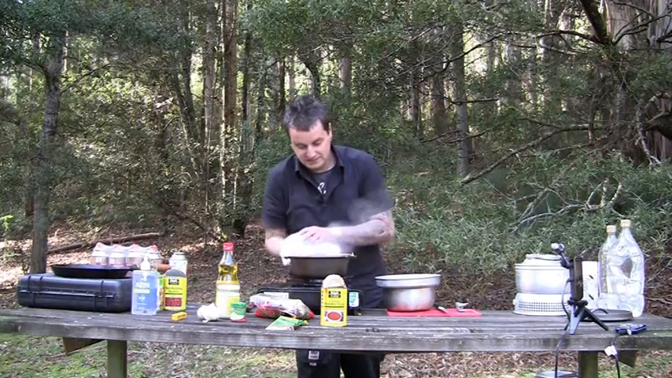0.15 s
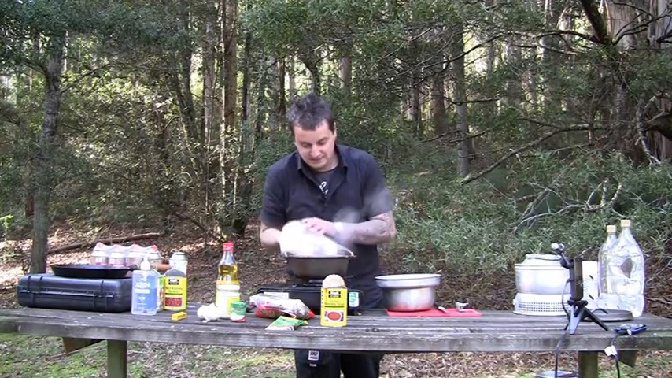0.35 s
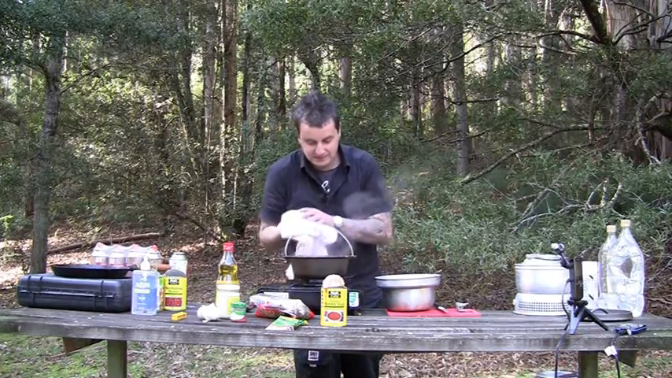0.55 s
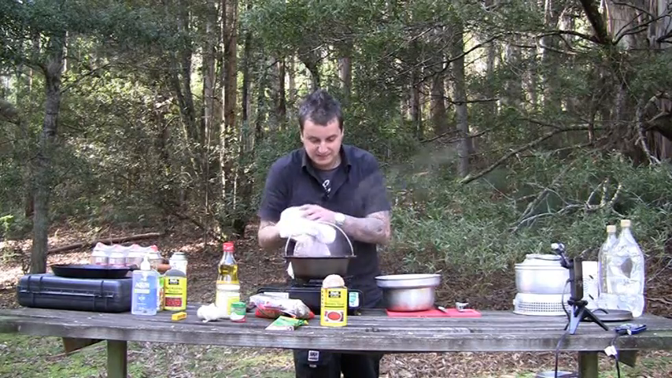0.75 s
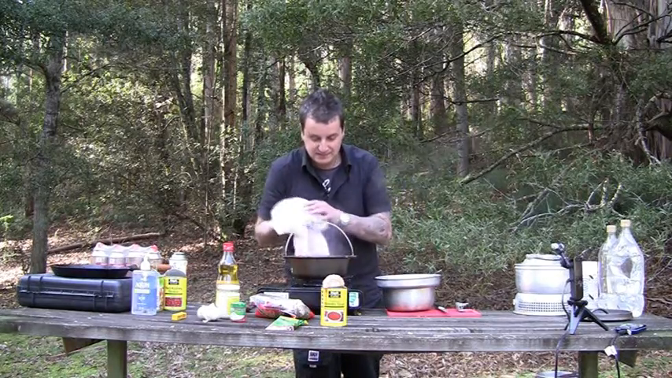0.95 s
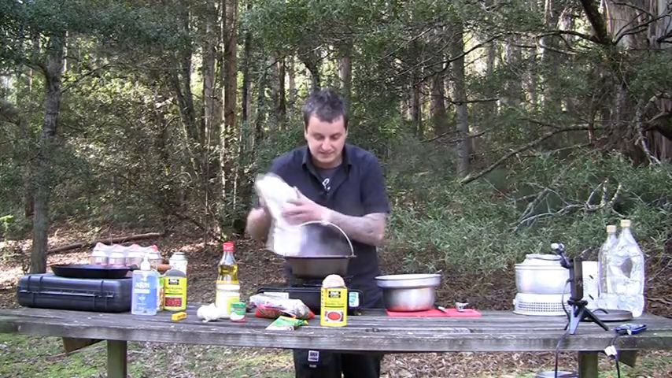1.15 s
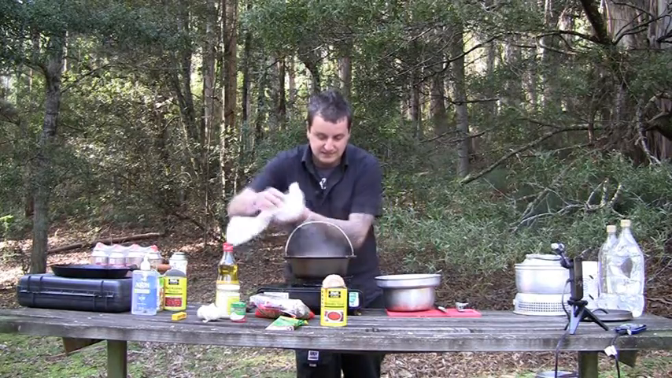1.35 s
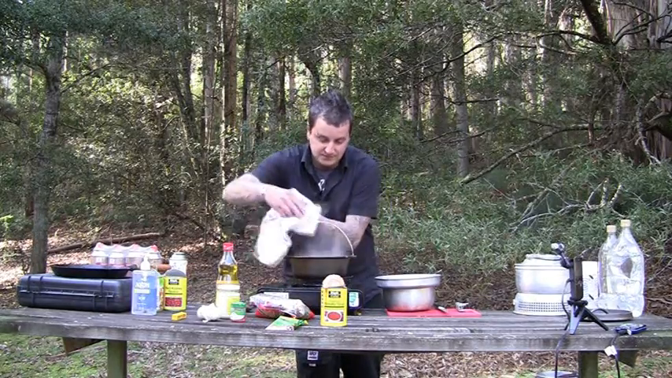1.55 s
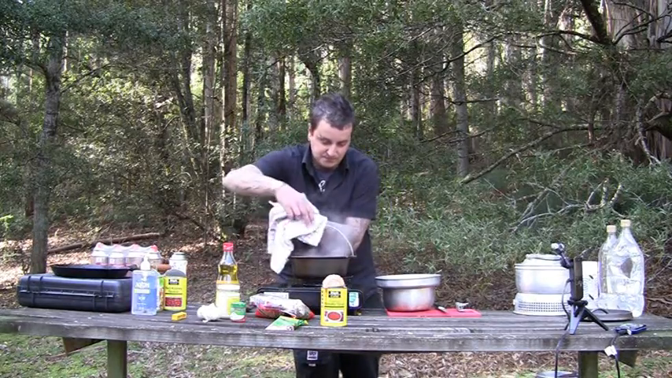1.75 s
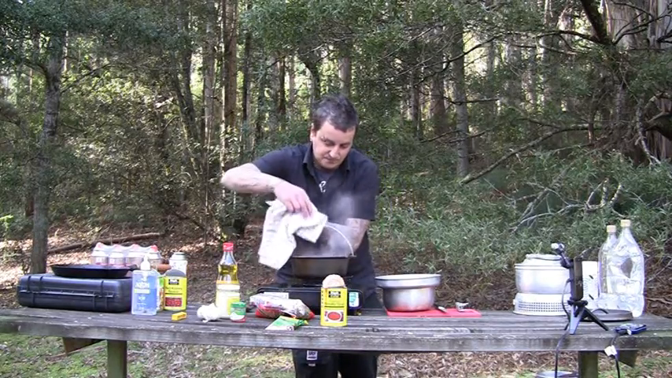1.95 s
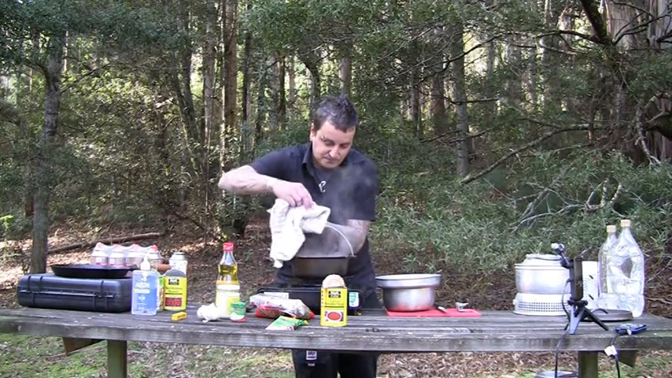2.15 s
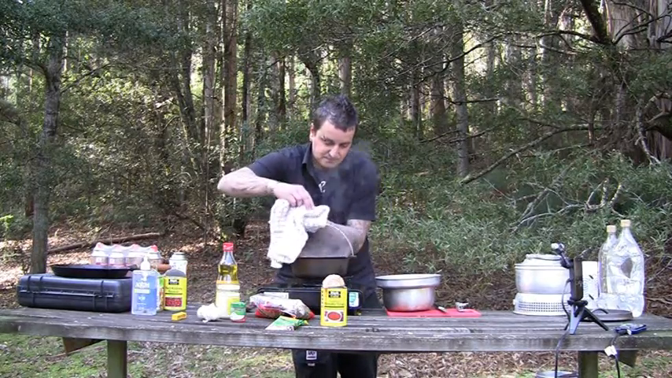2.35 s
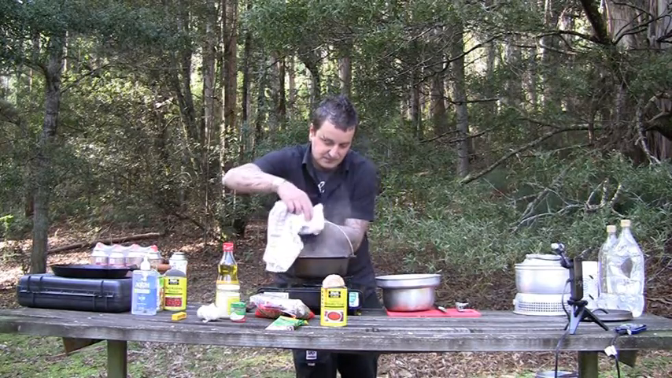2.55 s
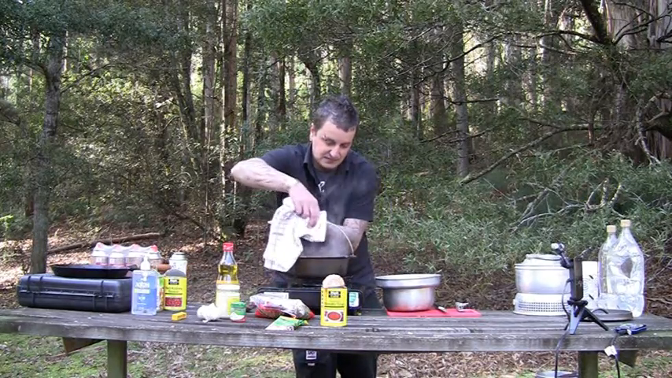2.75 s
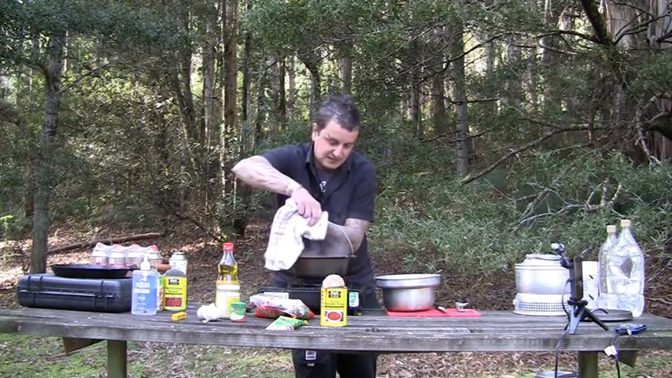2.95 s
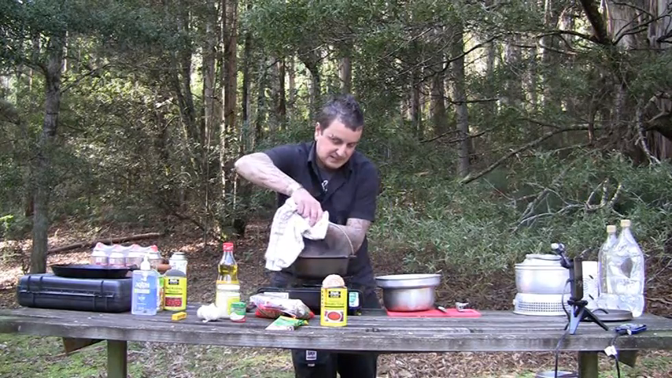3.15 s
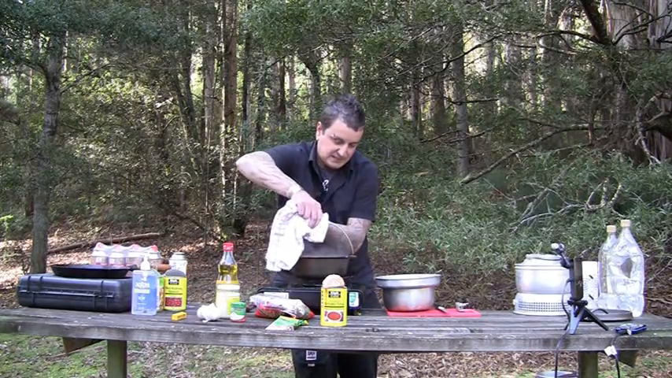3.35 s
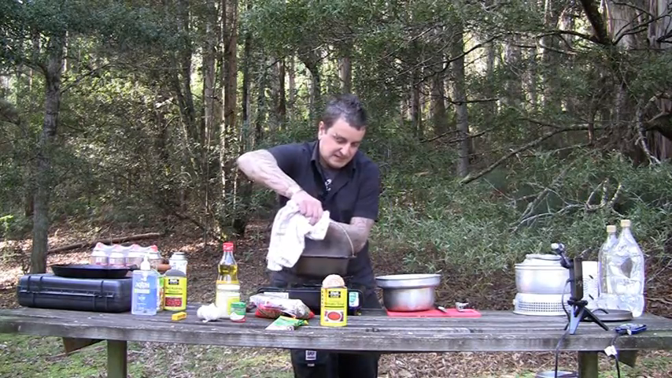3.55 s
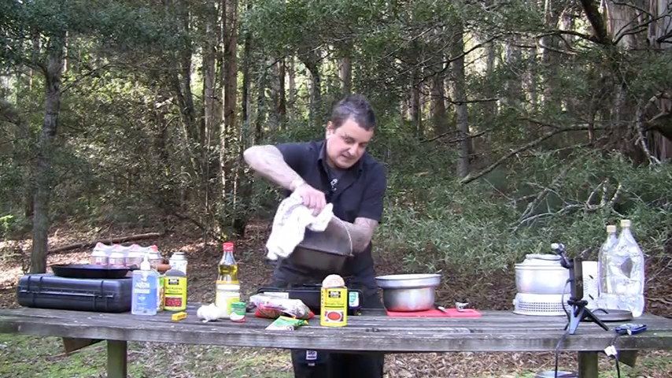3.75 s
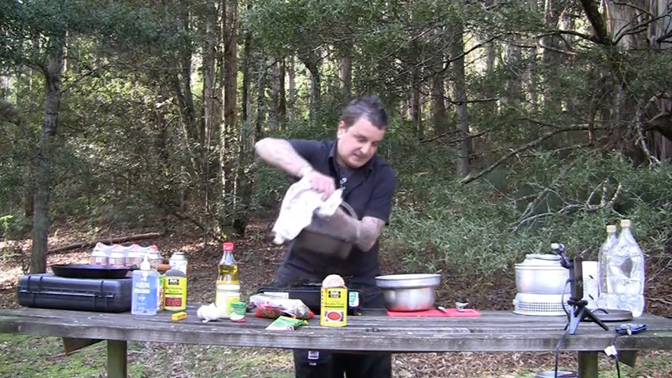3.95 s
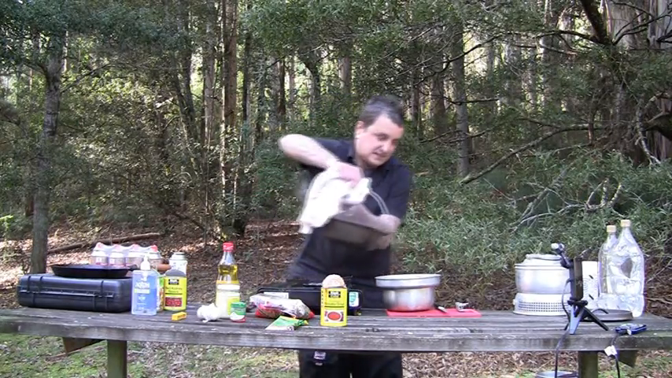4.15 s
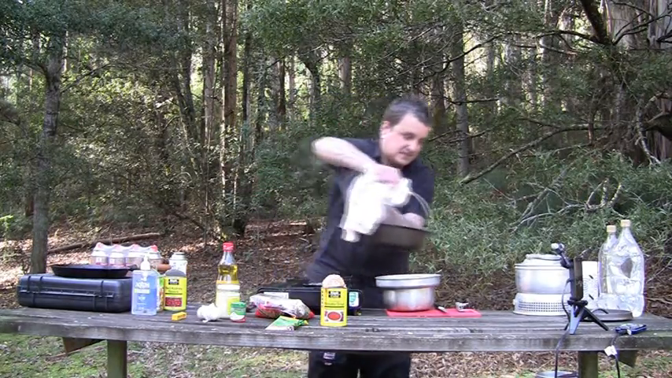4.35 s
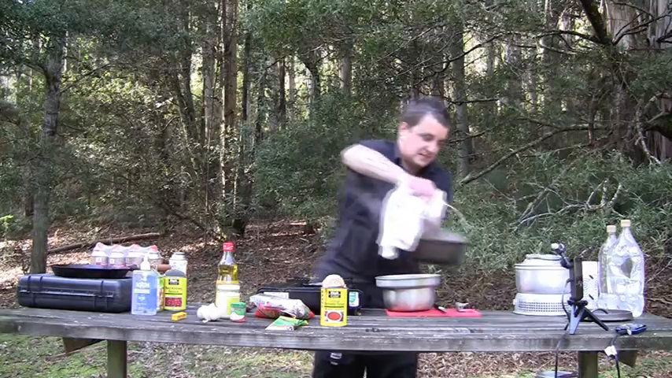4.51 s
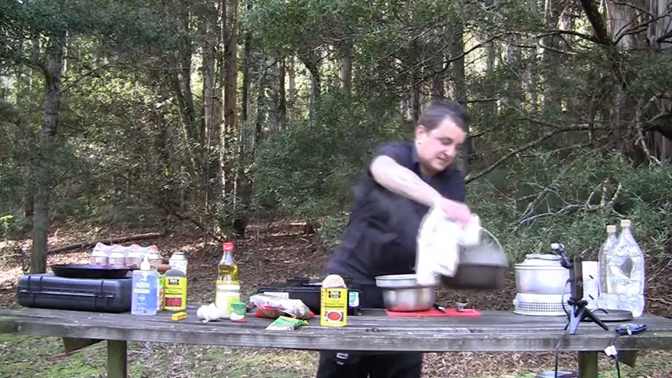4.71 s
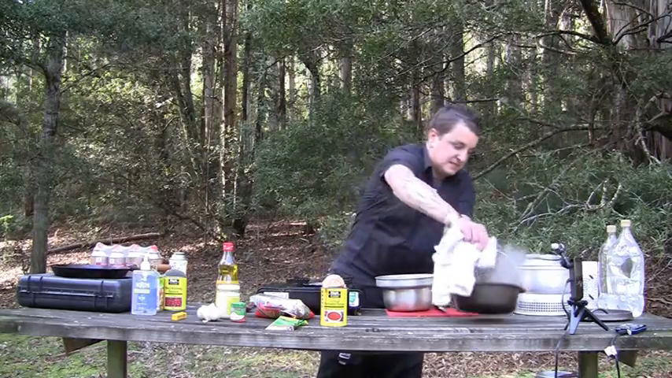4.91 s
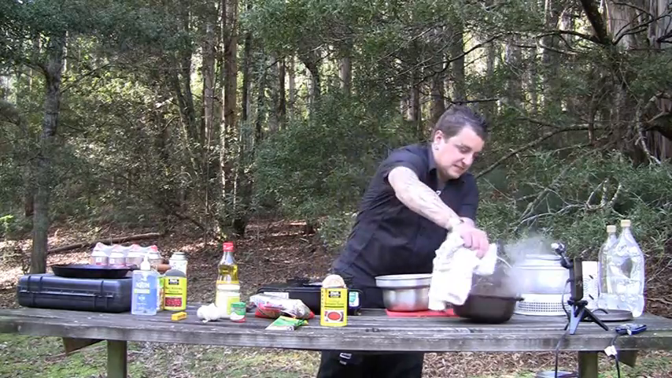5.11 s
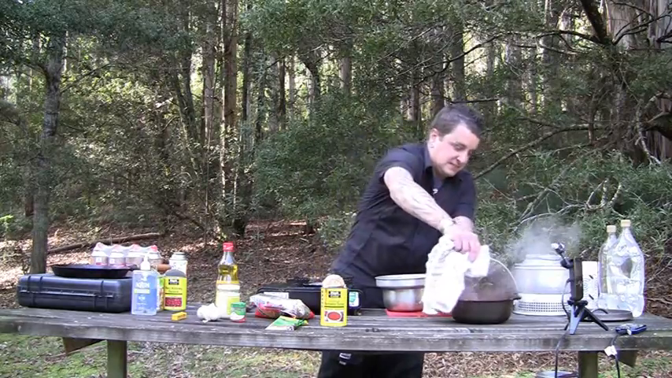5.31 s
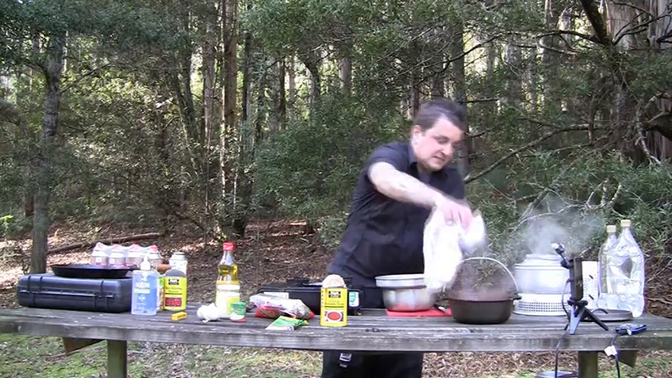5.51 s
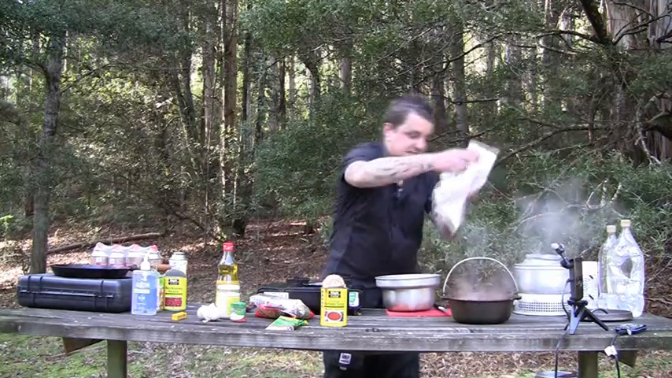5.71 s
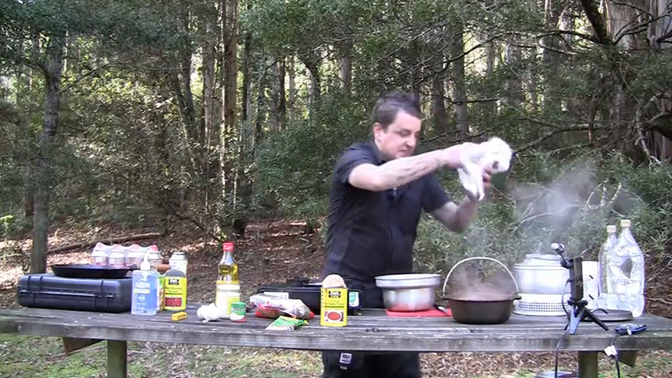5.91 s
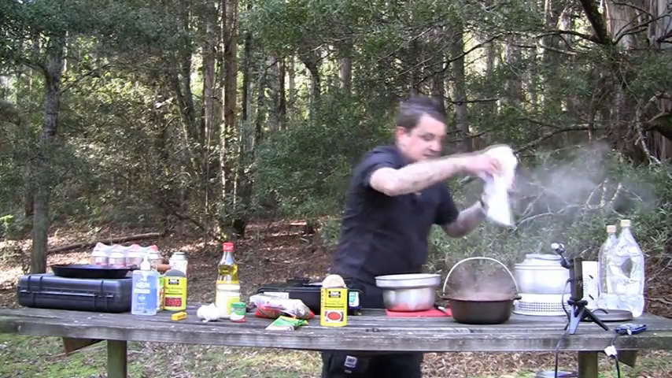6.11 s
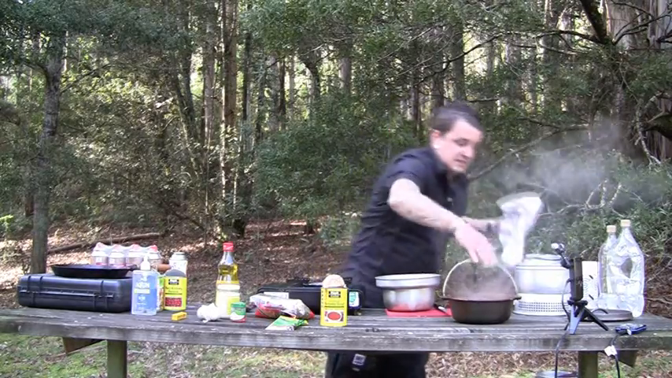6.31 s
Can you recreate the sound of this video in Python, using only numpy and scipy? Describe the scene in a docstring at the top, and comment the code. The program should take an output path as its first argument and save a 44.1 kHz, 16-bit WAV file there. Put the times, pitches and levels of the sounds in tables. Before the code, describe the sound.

A pot bubbles faintly in a forest, scrapes off a stove, thumps onto a wooden table, and its wire handle falls with a sharp clack.

```python
"""At a camp kitchen in a forest, stew bubbles faintly in a cast-iron pot, and a cloth rustles and taps
at its wire handle. A far bird gives one thin whistle. At about 3 seconds the pot knocks and scrapes
on the stove grate, making the iron ring. It is carried over with its handle ticking, and just after
5 seconds it thumps onto a wooden table and rocks. Last, the handle falls on the rim with a sharp clack."""
import sys
import numpy as np
from scipy import signal
from scipy.fft import rfft, irfft, next_fast_len
from scipy.io import wavfile
from scipy.ndimage import uniform_filter1d

SR = 44100
rng = np.random.default_rng(int(sys.argv[2]) if len(sys.argv) > 2 else 0)


def persist_wave(psi):
    """Save psi, clipped to +-1, as 16-bit WAV."""
    counts = np.round(np.clip(psi, -1, 1) * 32767).astype(np.int16)
    wavfile.write(sys.argv[1], SR, np.atleast_2d(counts).T)


N = 281093
TIME = np.arange(N) / SR

# The tone of steady noises. Each row: frequency in Hz, relative strength in dB.
AIR_SPECTRUM = [(12, -13), (20, -2.5), (77, 0), (182, -10), (293, -10.5), (527, -13.5), (590, -13),
                (698, -16), (802, -15.5), (1610, -18), (3070, -20.5), (4180, -20), (9670, -25),
                (11100, -25), (16000, -25.5)]
HISS_SPECTRUM = [(3000, -13), (9000, -4.5), (10000, -17), (10700, 2.5), (12000, -1.5), (13000, -5.5),
                 (16000, -2)]
CLOTH_SPECTRUM = [(100, -5), (400, 2.5), (900, 1.5), (1500, 1.5), (2400, 1), (3500, -2), (4500, -8.5),
                  (8000, -12), (14000, -52)]
# How alike the air is left and right. Each row: frequency in Hz, likeness (1 means the same).
AIR_LIKENESS = [(60, 0.86), (120, 0.87), (240, 0.64), (480, 0.64), (950, 0.45), (1890, 0.29),
                (3770, -0.081), (7520, 0.077), (15000, -0.28)]

# The larger bubbles. Each row: start in seconds, level in dB, pitch in Hz.
BIG_PLOPS = [(0.491, -54, 473), (2.785, -49, 554), (3.325, -43, 535), (4.035, -44.5, 580)]
# Spits of fizz at the hot wall. Each row: start in seconds, level in dB.
SPITS = [(.5054, -62), (.925, -52.5), (1.0501, -56), (1.1619, -55.5), (1.20, -62), (1.36, -57),
         (1.7236, -57), (1.77, -64), (2.3816, -57)]
# One cloth swish for each move of the hands. Each row: middle and length in seconds, level in dB.
SWISHES = [(.03, 0.055, -61.5), (0.475, 0.093, -64), (1.17, .45, -64.5), (1.767, 0.089, -63),
           (3.077, 0.86, -63), (3.36, 0.13, -62), (4.233, 0.13, -56.5), (4.548, 0.53, -60.5),
           (5.55, 0.099, -54), (5.803, .12, -62), (6.15, 0.12, -56), (6.31, 0.15, -56)]
# Cloth pulling tight. Each row: middle in seconds, level in dB, length in seconds, pitch in Hz.
SQUEAKS = [(3.122, -56, 0.032, 2400), (5.735, -56.5, 0.049, 2370), (5.804, -58, 0.054, 2530)]
# Iron dragging on the grate. Each row: start and length in seconds, starting level in dB.
DRAGS = [(3.484, 0.029, -55.5), (3.547, 0.093, -57.5)]

# Single hits. Each row: start in seconds, level in dB, brightness in Hz (treble above it is softened).
CLOTH_TAPS = [(.43, -46, 700), (.985, -40, 410), (1.017, -44.5, 1600), (2.479, -48, 2000)]  # the cloth is put to the handle
GRATE_KNOCKS = [(2.9455, -31, 3680), (2.9497, -39, 5000), (3.3529, -42, 6000)]
POT_JOLTS = [(3.4906, -50, 6500), (3.5107, -46, 6500), (3.6003, -29.5, 8000), (3.6028, -31, 7000),
             (3.6085, -37, 7000), (3.6190, -39, 9000), (3.6220, -35.5, 11000)]  # the pot is dragged off and jolts on its handle
BELLY_BOOMS = [(5.1335, -36.5, 840), (5.2150, -56, 1200), (5.2930, -41.5, 540), (5.5340, -45.5, 2000)]  # the full pot settles
BASE_CLINKS = [(5.2130, -33.5, 2200), (5.2200, -37, 1810), (5.2965, -48, 4000)]  # its bottom touches down as it rocks
FOOT_CLACKS = [(5.1159, -45.5, 3970), (5.2137, -49, 4000), (5.2962, -34, 10000), (5.2985, -38, 9000)]  # its foot meets the table
HANDLE_FALL = [(6.3606, -17, 10000)]
# Bouncing hits. Each row: start in seconds, level in dB, brightness in Hz, bounce gap in seconds.
TABLE_THUMPS = [(5.1135, -30.5, 380, 0.01), (5.1465, -41, 500, .012), (5.2035, -36, 320, .0095),
                (5.2915, -31, 480, .0235), (5.5325, -38.5, 990, 0.012), (6.1120, -43.5, 250, .008)]
HANDLE_TICKS = [(3.5564, -43, 11000, .0015), (4.2708, -40, 4480, .0012), (4.8934, -44.5, 8000, 0.0026),
                (5.5354, -36, 3200, 0.01), (5.5648, -34.5, 10000, 0.0023), (6.1620, -43, 4000, 0.0068),
                (6.3280, -37, 3500, .004), (6.3378, -26.5, 3220, .0015)]
# The falling handle's first touch: a dull push and a bright pulse.
# Each row: start in seconds, peak in dB, lower and upper band edge in Hz.
HANDLE_SNAP = [(6.3605, -18, 330, 3600), (6.3604, -6, 6630, 10160)]

# Modes are the tones a thing rings with when hit.
# Each row: pitch in Hz, relative strength in dB, seconds to fade by 60 dB (called t60).
TAP_MODES = [(300, -8, 0.047), (410, -2, 0.019), (720, -3, 0.018), (910, -5, 0.035), (1050, -11, .02)]
GRATE_MODES = [(78, -11, 0.25), (125, -8, 0.2), (315, -18, 0.12), (430, -3, 0.053), (580, -3.5, 0.075),
               (780, -1.5, 0.037), (940, 0, 0.017), (1147, -14, 0.099), (1687, -1, 0.038),
               (2260, -3.5, 0.063), (2640, -7.5, 0.049), (2820, -7, 0.039), (3090, -5, 0.036),
               (4650, -26, .03)]
POT_MODES = [(445, -6, 0.15), (608, -0.5, 0.034), (930, -13, 0.083), (1120, -16, 0.086), (1490, -2, 0.061),
             (1556, -0.5, 0.072), (1621, -1, 0.064), (1725, -2, 0.043), (1900, -2.5, .045),
             (2225, -4, 0.077), (2277, 2.5, 0.025), (2410, 0, 0.043), (2540, -7, 0.032), (2940, -7, 0.072),
             (3100, 0, 0.054), (3300, -1, 0.038), (3760, -3, 0.049), (4040, -14, .045), (4480, -20, .05),
             (4700, -6, .045), (5750, -7, 0.035), (6540, -14, .05), (7400, -13, .04), (8120, -12, .06),
             (10700, -15, 0.044), (11300, -8.5, .05)]
TABLE_MODES = [(46.9, -14.5, 1), (97.4, -9, 0.26), (133, 2, 0.06), (163, -1, 0.09), (204.3, 1.5, 0.1),
               (274, -1, 0.093), (326, -4, 0.056), (393, -8, 0.053)]
BELLY_MODES = [(390, -3, 0.1), (571, -0.5, 0.11), (660, -19, .05), (820, -12, 0.052), (1170, -14, .06)]
BASE_MODES = [(1472, -0.5, 0.075), (1590, -4.5, 0.046), (1180, -20, .04), (3580, -16, 0.11)]
FOOT_MODES = [(1480, -8, 0.17), (1950, -18, .03), (2620, -8, .05), (2900, -5, .045), (3090, -2.5, 0.042),
              (3583, 3, 0.055), (3760, -5, 0.048), (6270, 0, 0.032), (6900, 2, 0.021), (7500, -13, .02),
              (9900, -17, 0.023)]
LUG_MODES = [(516, -7.5, 0.0098), (840, -14, 0.023), (1460, -13, 0.022), (1680, -5.5, 0.028),
             (2070, -8, 0.023), (2630, 3.5, 0.012), (2970, 2, 0.008), (3350, 2.5, 0.011), (3800, -5, 0.034),
             (4090, -10, .02), (5640, 1, 0.016), (6500, -12, .02), (7750, -4, 0.018), (9050, -11, .015)]  # lugs are the loops that hold the handle
HANDLE_MODES = [(186, -2, 0.039), (640, 7, .014), (830, 7.5, 0.018), (1230, -19, 0.0097),
                (1630, -11, 0.013), (2230, -3, 0.022), (2670, -17, .015), (3480, 5, 0.017),
                (4180, -3, .018), (4940, 4, 0.018), (5100, 1, 0.016), (5870, 0, 0.027), (6340, -9, 0.025),
                (7100, 2, 0.023), (7800, -10, 0.029), (8140, 12, 0.024), (9100, -5, .014),
                (10000, 11, 0.025)]
# A hit's crack is a short wash of crowded overtones. Each row: frequency in Hz, relative strength in dB.
IRON_CRACK = [(100, -11), (450, 1.5), (1000, 3), (2000, 0), (3300, 1), (4500, -3), (7500, -7.5),
              (11000, -12.5), (15000, -6)]
WOOD_CRACK = [(40, -23), (120, 11.5), (300, -7), (600, -4.5), (1000, -9), (4000, -32), (12000, -45)]
POT_CRACK = [(100, -18), (450, -2), (1150, -13), (1560, 16.5), (1950, 2), (2350, 7), (2700, -1), (3200, 10),
             (3600, -6), (7500, -9), (9500, -20), (11200, -6), (12000, -24), (15000, -32)]


def from_db(db):
    """Turn decibels into a number to multiply by."""
    return 10 ** (np.asarray(db) / 20)


def unit_power(x):
    """Scale a sound so its average power is one."""
    return x / np.sqrt(np.mean(x ** 2) + 1e-20)


def at_hz(points, hz):
    """Read between the rows of a table, giving each octave equal room."""
    known_hz, values = np.transpose(points)
    return np.interp(np.log(hz + 1e-6), np.log(known_hz), values)


def noise(spectrum, size):
    """Noise with the given tone, at power one."""
    padded = next_fast_len(size)
    hz = np.fft.rfftfreq(padded, 1 / SR)
    phases = np.exp(2j * np.pi * rng.random(len(hz)))
    return unit_power(irfft(phases * from_db(at_hz(spectrum, hz)), padded)[:size])


def drift(per_s):
    """A random wander that heads for a new value per_s times a second."""
    points = rng.standard_normal(4096)
    return unit_power(np.interp(TIME * per_s, np.arange(len(points)), points))


def clicks(per_s, spread_db):
    """Random clicks of uneven size."""
    sizes = from_db(spread_db * np.minimum(rng.exponential(1, N), 4)) * rng.choice([-1, 1], N)
    return sizes * (rng.random(N) < per_s / SR)


def fade(t, t60):
    """Die away by 60 dB every t60 seconds."""
    return np.exp(-np.log(1000) * t / t60)


def swell(middle, length):
    """Rise and fall smoothly around a moment."""
    return np.exp(-(2 * (TIME - middle) / length) ** 2)


def held(start, length, attack_s, release_t60):
    """Rise, hold, then die away."""
    rise = np.clip((TIME - start) / attack_s, 0, 1)
    return rise * fade(np.maximum(TIME - start - length, 0), release_t60)


def soften(x, above_hz, order=2):
    """Turn down the treble; a higher order cuts more steeply."""
    return signal.sosfilt(signal.butter(order, above_hz, fs=SR, output="sos"), x)


def add(track, start, sound):
    """Mix a sound into a track at a start time in seconds."""
    first = min(round(start * SR), N - 1)
    track[first:first + len(sound)] += sound[:N - first]


def forest_air(air_db, drone_db, drone_hz):
    """Steady air, most alike on both sides in the bass, with a far low drone."""
    size = next_fast_len(N)
    hz = np.fft.rfftfreq(size, 1 / SR)
    alike = at_hz(AIR_LIKENESS, hz)
    mid, side = rfft(rng.standard_normal((2, size)))
    stereo = np.sqrt(1 + alike) * mid + np.sqrt(1 - alike) * side * np.array([[1], [-1]])
    air = unit_power(irfft(stereo * from_db(at_hz(AIR_SPECTRUM, hz)), size)[:, :N])
    phase = 2 * np.pi * drone_hz * TIME
    drone = unit_power(drift(9) * np.sin(phase) + drift(15) * np.cos(phase))
    return from_db(air_db) * air + from_db(drone_db) * drone


def tree_echo(x, t60, dull_hz):
    """Trunks scatter a dull, dying echo, different on each side."""
    t = TIME[:SR // 2]
    scatter = rng.standard_normal((2, len(t))) * fade(t, t60) * (t > .008)
    scatter /= np.linalg.norm(scatter, axis=1, keepdims=True)
    mid, side = soften(scatter, dull_hz, order=1)
    return signal.fftconvolve(x[None], mid + 0.17 * side * np.array([[1], [-1]]), axes=1)[:, :N]


def stereo_spread(x, t60, size=2048):
    """A very short scatter, opposite on the left and right, widens the close sounds."""
    scatter = rng.standard_normal(size) * fade(TIME[:size], t60)
    return signal.oaconvolve(x, scatter / np.linalg.norm(scatter))[:N] * np.array([[1], [-1]])


def bird(start=2.509, length=0.4, notes_from_s=2.7, note_s=0.042):
    """A thin, raspy whistle swoops in, sags and breaks into falling notes, blurred by the trees."""
    age = np.clip(TIME - start, 0, 2 * length)
    through_note = np.maximum(TIME - notes_from_s, 0) / note_s % 1
    swoop_hz = 1590 * np.exp(-age / .014)
    sag_hz = 435 * (age / length) ** 2
    slur_hz = 420 * (through_note - .5)
    hz = 7310 + swoop_hz - sag_hz - slur_hz
    hz *= 1 + 0.0126 * drift(700)  # a fast waver makes the rasp
    level = from_db(-63) * held(start, length, attack_s=0.017, release_t60=.22)
    whistle = level * np.sin(2 * np.pi * np.cumsum(hz) / SR)
    return whistle + from_db(-1) * tree_echo(whistle, t60=0.46, dull_hz=12000)


def bubble(hz, cycles):
    """A bursting bubble rings, fading by 60 dB over the given number of cycles."""
    t = TIME[:2048]
    return np.sin(2 * np.pi * hz * t) * fade(t, cycles / hz)


def bubbling(per_s, low_hz, high_hz, cycles, sizes=10):
    """Bubbles of mixed sizes burst at random, each size with its own pitch."""
    bursts = clicks(per_s, spread_db=3.5)
    size_of_burst = rng.integers(0, sizes, N)
    return unit_power(sum(signal.oaconvolve(bursts * (size_of_burst == k), bubble(hz, cycles))[:N]
                          for k, hz in enumerate(np.geomspace(low_hz, high_hz, sizes))))


def stew(plops_db, fizz_db):
    """Thick plops in the middle of the pot, fine fizz and spits at its hot wall."""
    tilt_db = 6 * swell(middle=3.2, length=1)  # the plops grow louder as the pot tilts
    fizz_level = np.full(N, from_db(fizz_db))
    for start, db in SPITS:
        add(fizz_level, start, from_db(db) * fade(TIME[:SR // 2], t60=0.096))
    fizz_level = uniform_filter1d(fizz_level, size=400)  # each spit swells softly
    plops = bubbling(per_s=130, low_hz=276, high_hz=1005, cycles=16.5)
    fizz = bubbling(per_s=900, low_hz=2740, high_hz=3480, cycles=18)
    out = from_db(plops_db + tilt_db) * plops + fizz_level * fizz
    for start, db, hz in BIG_PLOPS:
        add(out, start, from_db(db) * bubble(hz, cycles=18))
    return out


def cloth(grip_s, flutter_db, squeak_width_hz):
    """Fibres rub unevenly as the hands move; pulled tight, they stick and slip near one pitch."""
    # Once the handle is gripped, the sleeves rub more and more as the arms swing wider.
    sleeves_db = np.where(TIME < grip_s, -81, -72.5 + 3.5 * (TIME - grip_s))
    swish_power = sum((from_db(db) * swell(middle, length)) ** 2 for middle, length, db in SWISHES)
    level = np.sqrt(from_db(sleeves_db) ** 2 + swish_power)
    out = level * from_db(flutter_db * drift(90)) * noise(CLOTH_SPECTRUM, N)
    for middle, db, length, hz in SQUEAKS:
        narrow_band = signal.iirpeak(hz, hz / squeak_width_hz, fs=SR)
        squeak = unit_power(signal.lfilter(*narrow_band, rng.standard_normal(N)))
        out += from_db(db) * swell(middle, length) * squeak
    return out


def ringing(modes, t, spread_db=3):
    """The fading tones of one blow; the spot that is hit varies their strengths."""
    hz, db, t60 = np.transpose(modes)[:, :, None]
    gain = from_db(db + spread_db * rng.standard_normal(db.shape))
    signs = (-1) ** np.arange(len(hz))[:, None]
    tones = signs * gain * np.sin(2 * np.pi * hz * t) * fade(t, t60)
    return np.sum(tones, axis=0) / np.sqrt(np.sum(gain ** 2) / 2)


def struck(hits, modes, crack, crack_db, crack_t60, size=16384):
    """Each hit sets off ringing tones and a brief crack; a soft hit loses the treble."""
    out, t = np.zeros(N), TIME[:size]
    for start, db, bright_hz in hits:
        blow = ringing(modes, t)
        blow += from_db(crack_db) * noise(crack, size) * fade(t, crack_t60)
        add(out, start, from_db(db) * soften(blow, bright_hz))
    return out


def bouncing(hits, loss_db, count):
    """Each hit becomes a short run of ever weaker hits."""
    return [(start + k * gap, db - k * loss_db, bright_hz)
            for start, db, bright_hz, gap in hits for k in range(count)]


def handle_snap():
    """Wire meeting iron gives a very short pulse."""
    out = np.zeros(N)
    for start, db, low_hz, high_hz in HANDLE_SNAP:
        band = signal.butter(4, [low_hz, high_hz], "band", fs=SR, output="sos")
        pulse = signal.sosfilt(band, signal.unit_impulse(2048))
        add(out, start, from_db(db) * pulse / np.max(np.abs(pulse)))
    return out


def wire_handle():
    """The handle taps as the cloth meets it, chatters in its lugs, then falls on the rim."""
    taps = struck(CLOTH_TAPS, TAP_MODES, IRON_CRACK, crack_db=-1, crack_t60=0.019)
    ticks = bouncing(HANDLE_TICKS, loss_db=4.5, count=3)
    chatter = struck(ticks, LUG_MODES, IRON_CRACK, crack_db=-8.5, crack_t60=0.026)
    fall = struck(HANDLE_FALL, HANDLE_MODES, IRON_CRACK, crack_db=-4, crack_t60=0.02)
    return taps + chatter + fall + handle_snap()


def pot_scrape(rasp_db, rise_db_per_s, size=4096):
    """Dragging iron catches in many tiny, soft slips that ring the pot, with a gritty rasp."""
    pressure, t = np.zeros(N), TIME[:size]
    for start, length, db in DRAGS:  # each bites, presses harder, then dies as the pot comes free
        rise_db = rise_db_per_s * np.clip(TIME - start, 0, length)
        pressure += from_db(db + rise_db) * held(start, length, attack_s=.006, release_t60=.1)
    rings = signal.fftconvolve(clicks(per_s=1700, spread_db=2), ringing(POT_MODES, t))[:N]
    grit = clicks(per_s=2500, spread_db=2)
    rasp = signal.fftconvolve(grit, noise(IRON_CRACK, size) * fade(t, t60=0.0035))[:N]
    return pressure * soften(unit_power(rings) + from_db(rasp_db) * unit_power(rasp), above_hz=9000)


def pot_lift():
    """The pot knocks the grate, scrapes off it and jolts on its handle."""
    knocks = struck(GRATE_KNOCKS, GRATE_MODES, IRON_CRACK, crack_db=-8.5, crack_t60=0.074)
    jolts = struck(POT_JOLTS, POT_MODES, POT_CRACK, crack_db=-0.5, crack_t60=0.034)
    return knocks + jolts + pot_scrape(rasp_db=2, rise_db_per_s=125)


def pot_landing():
    """The pot's weight thumps the planks; its belly booms, its base clinks and its foot clacks."""
    thumps = bouncing(TABLE_THUMPS, loss_db=6.5, count=2)
    planks = struck(thumps, TABLE_MODES, WOOD_CRACK, crack_db=-5.5, crack_t60=0.21)
    belly = struck(BELLY_BOOMS, BELLY_MODES, WOOD_CRACK, crack_db=-20, crack_t60=0.046)
    base = struck(BASE_CLINKS, BASE_MODES, IRON_CRACK, crack_db=-26, crack_t60=0.044)
    foot = struck(FOOT_CLACKS, FOOT_MODES, IRON_CRACK, crack_db=-3.5, crack_t60=0.052)
    return planks + belly + base + foot


def scene():
    """The pot and the hands are close and central; the forest is all round."""
    near = pot_lift() + pot_landing() + wire_handle()
    near += stew(plops_db=-67, fizz_db=-68)
    near += cloth(grip_s=2.55, flutter_db=2, squeak_width_hz=270)
    echo = from_db(-24) * tree_echo(near, t60=0.52, dull_hz=3000)
    width = from_db(-20.5) * stereo_spread(near, t60=0.01)
    return near + echo + width + bird() + forest_air(air_db=-54, drone_db=-69.5, drone_hz=42.5)


def record(dry, cutoff_hz=15800):
    """The microphone softens the highest treble and adds faint hiss; the very top is cut steeply."""
    soft = soften(dry, above_hz=13000, order=3)
    hiss = from_db(-65) * np.array([noise(HISS_SPECTRUM, N), noise(HISS_SPECTRUM, N)])
    steep_cut = signal.ellip(12, .1, 70, cutoff_hz, fs=SR, output="sos")
    return signal.sosfilt(steep_cut, soft + hiss)


dry = scene()
out = record(dry)
persist_wave(out)
```